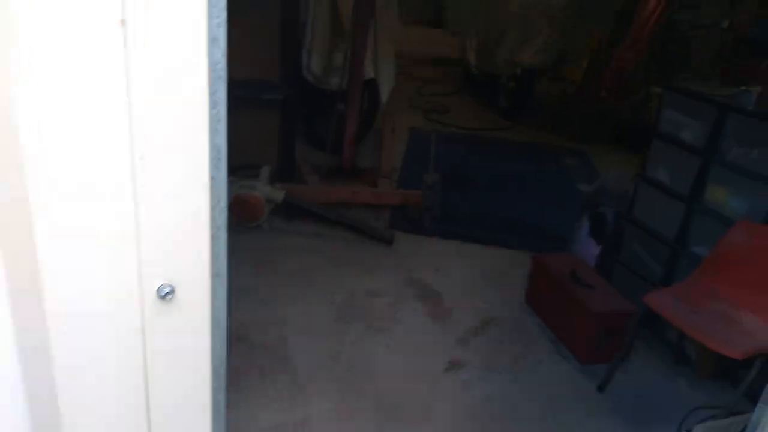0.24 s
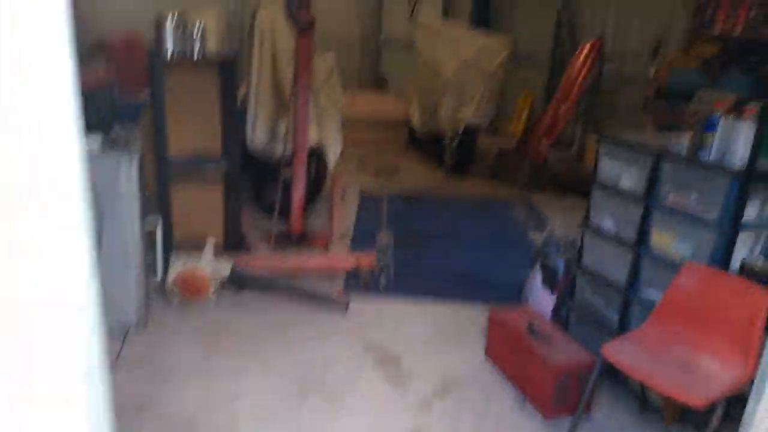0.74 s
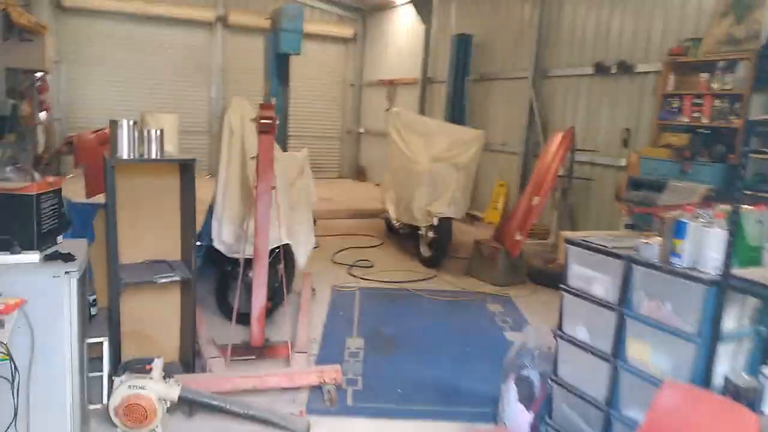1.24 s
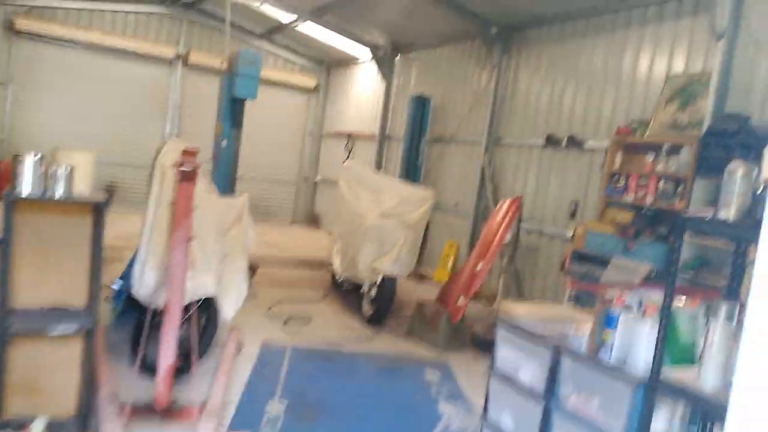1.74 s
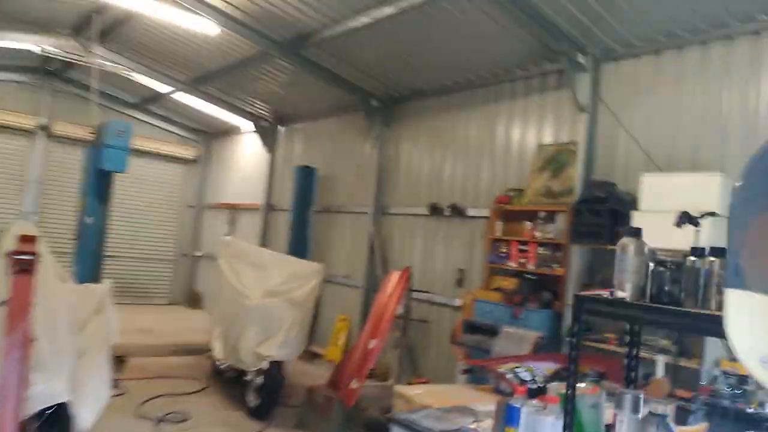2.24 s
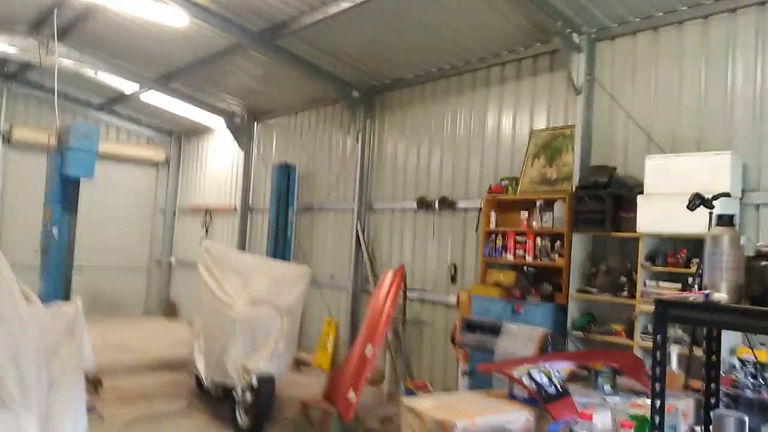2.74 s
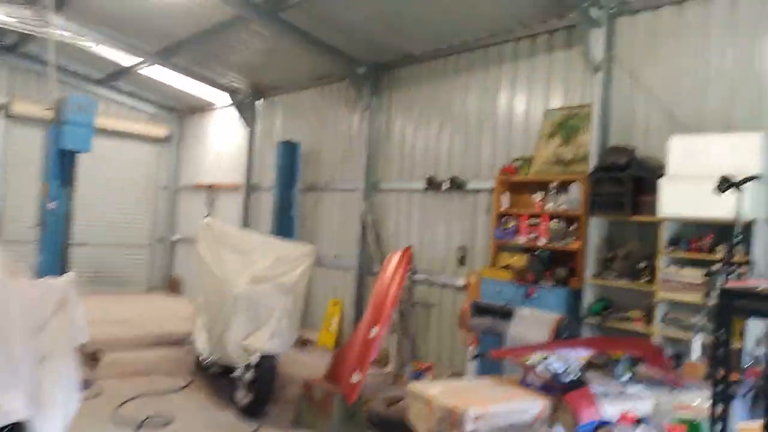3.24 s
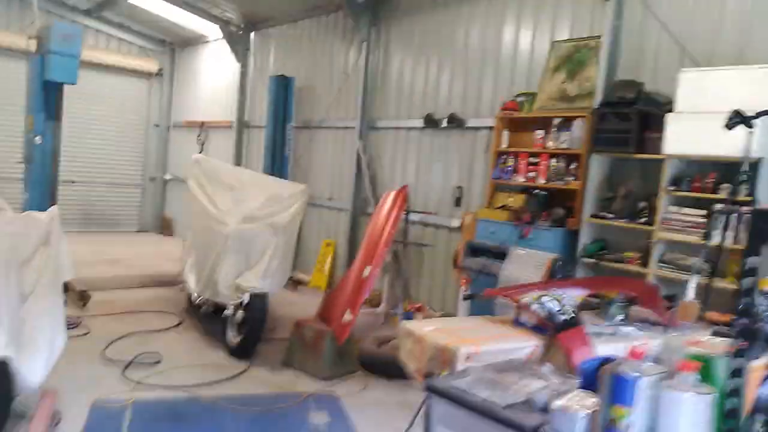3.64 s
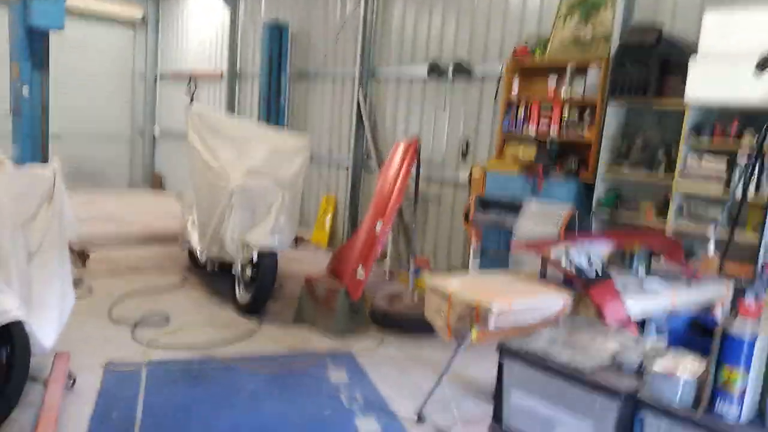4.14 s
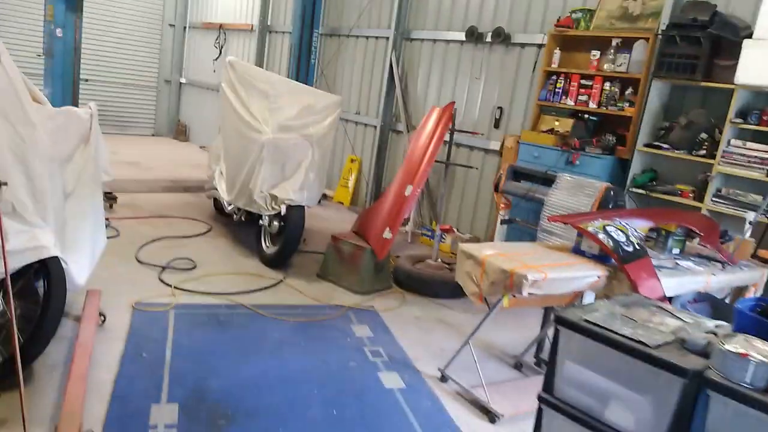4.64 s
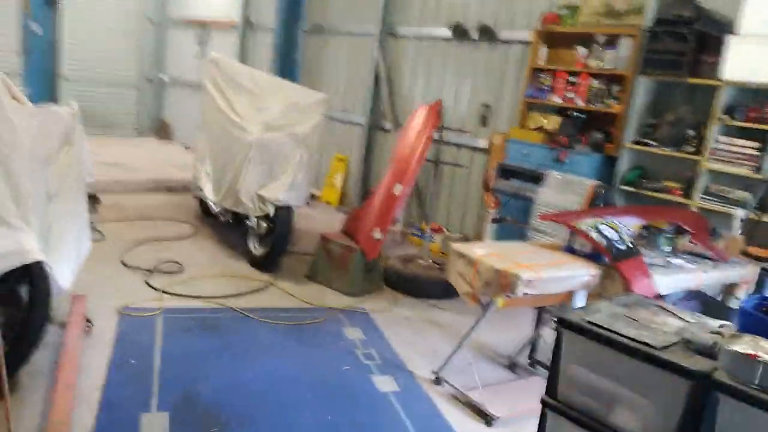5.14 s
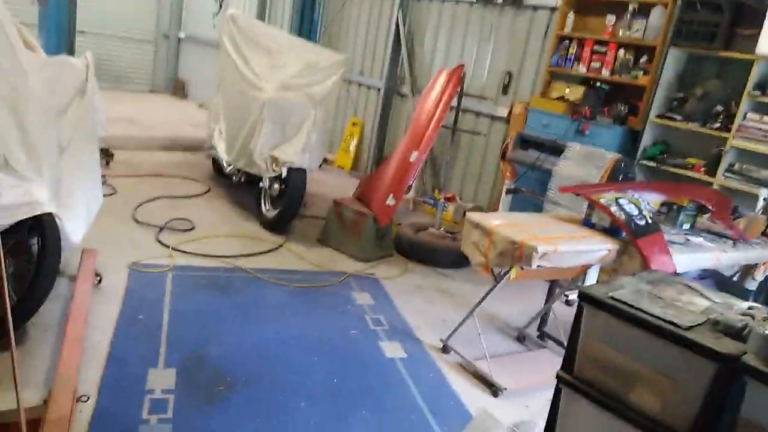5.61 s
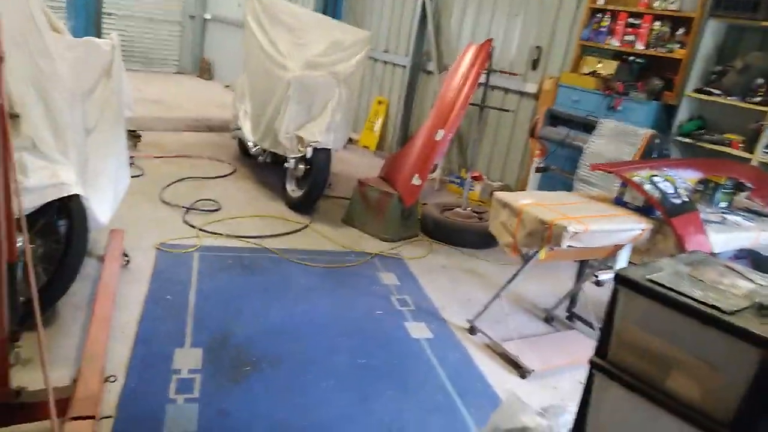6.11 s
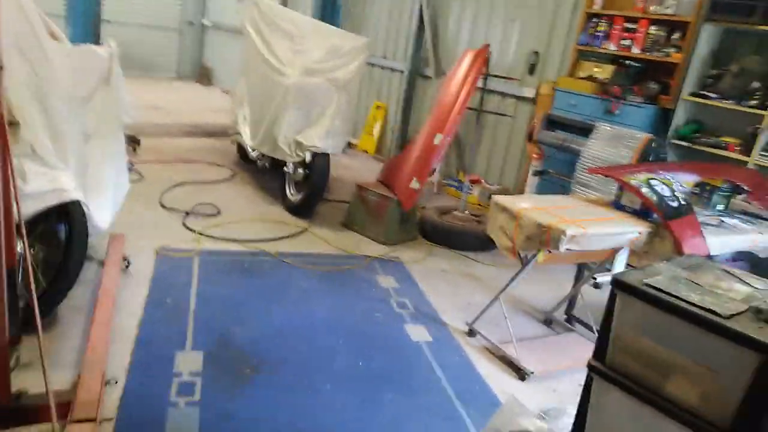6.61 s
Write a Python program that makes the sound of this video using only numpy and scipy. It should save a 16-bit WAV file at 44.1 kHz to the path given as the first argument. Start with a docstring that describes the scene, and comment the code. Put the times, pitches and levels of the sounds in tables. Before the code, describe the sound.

A metal-clad shed door scrapes open with a harsh gritty slide, clothes and shoes brush through, then the door creaks back, clacks and booms shut.

```python
"""In a workshop with still air, a steel-clad shed door scrapes open in a few slips and one long gritty slide.
Someone squeezes through: clothes brush, shoes scuff, loose metal knocks. The door creaks back, clacks and booms
against its frame, its cladding rattles, and one more step follows. A hand-held pair of microphones hears it all.
Rubbing is made of countless tiny random catches; blows are bursts of noise and ringing tones that die away."""
import sys
import numpy as np
from scipy import signal
from scipy.fft import rfft, irfft, next_fast_len
from scipy.io import wavfile

SR = 44100
rng = np.random.default_rng(int(sys.argv[2]) if len(sys.argv) > 2 else 0)


def dump(signal):
    """Clip the signal to [-1, 1] and save it as 16-bit WAV at the path in sys.argv[1]."""
    limited = np.clip(np.atleast_2d(signal).T, -1, 1)
    pcm = np.round(limited * 32767).astype(np.int16)
    wavfile.write(sys.argv[1], SR, pcm)


N = 303025
TIME = np.arange(N) / SR

# spectrum of rubbing cloth: (frequency [Hz], relative level per Hz [dB])
FABRIC = [(250, -2.5), (450, 4), (700, -3), (1200, 2.5), (2000, -6), (3000, 2.5), (4500, -5.5),
          (6500, -1.5), (9000, -2), (11000, -4), (15000, -8.5)]
# ringing tones of the door panel: (frequency [Hz], relative level [dB], time to fall 60 dB [s])
PANEL_MODES = [(128.4, 0, 1.3), (195.3, 1.5, 0.55), (270.5, 0, 0.58), (386, -2, 0.79), (592, -6.5, 0.6),
               (684, -5, 0.32), (755, -10, 0.2), (886, -5.5, 0.39), (1060, -8.5, 0.66)]
# ringing tones of loose metal by the doorway: (frequency [Hz], relative level [dB], time to fall 60 dB [s])
LOOSE_METAL_MODES = [(871, 0.5, 0.16), (1140, -2, 0.28), (1430, -8, 0.29), (2100, -1.5, 0.15)]

PORT_SPACING_S = 0.00054   # travel time of sound from one microphone port to the other
RASP_STOP_S = 1.305   # the sheet lifts clear
SQUEEZE_FROM_S, SQUEEZE_TO_S = 3.11, 3.97   # one long drag through the gap
# (time [s], relative level [dB]) of the door edge and the door panel against the frame, and of the last heel
CLACK_AT, BOOM_AT, HEEL_AT = (5.457, -20.5), (5.784, -25), (6.572, -33)


def from_db(db):
    """Turn decibels into a gain."""
    return 10 ** (np.asarray(db) / 20)


def rms_one(x):
    """Scale a sound to an average (RMS) strength of 1."""
    return x / np.sqrt(np.mean(x ** 2) + 1e-20)


def at_hz(points, hz):
    """Read a table at any frequency, with straight lines on a log-frequency axis."""
    table_hz, values = np.array(points).T
    return np.interp(np.log(np.maximum(hz, 1)), np.log(table_hz), values)


def drift(rate_hz):
    """Slow random wandering with spread 1, worked out at every 20th sample."""
    r = np.exp(-2 * np.pi * rate_hz * 20 / SR)
    noise = rng.standard_normal(N // 20 + 2002)
    slow = signal.lfilter([1], [1, -2 * r, r * r], noise)[2000:]   # drop the filter's start-up
    return np.interp(np.arange(N) / 20, np.arange(len(slow)), rms_one(slow))


def band(x, low_hz, high_hz, order=2):
    """Keep only one range of frequencies."""
    sos = signal.butter(order, [low_hz, high_hz], "band", fs=SR, output="sos")
    return signal.sosfilt(sos, x + 1e-18)


def colour(x, spectrum):
    """Give a steady sound a spectrum."""
    size = next_fast_len(N, True)
    gains = from_db(at_hz(spectrum, np.fft.rfftfreq(size, 1 / SR)))
    return irfft(rfft(x, size) * gains, size)[..., :N]


def resonance(x, hz, width_hz):
    """One resonance: a narrow band-pass with gain 1 at its top."""
    r = np.exp(-np.pi * width_hz / SR)
    feedback = [1, -2 * r * np.cos(2 * np.pi * hz / SR), r * r]
    return signal.lfilter(np.array([1, 0, -1]) * (1 - r * r) / 2, feedback, x)


def resonances(x, modes):
    """Several resonances side by side, each with its own width and level."""
    return sum(from_db(db) * resonance(x, hz, width_hz) for hz, width_hz, db in modes)


def pan(left_db):
    """Left and right gains; left_db is how much louder the left is."""
    return from_db(left_db * np.array([[.5], [-.5]]))


def after(s):
    """Seconds gone by since a moment; zero before it."""
    return np.maximum(TIME - s, 0)


def held(from_s, to_s, rise_db_per_s, fall_db_per_s):
    """Fade in, hold at gain 1, fade out."""
    return from_db(-rise_db_per_s * np.maximum(from_s - TIME, 0) - fall_db_per_s * after(to_s))


def stroke(s, length_s):
    """A rubbing movement swells quickly to gain 1 and dies more slowly."""
    t = TIME - s
    swell = (np.minimum(t, 0) / (0.85 * length_s)) ** 2
    fade = np.maximum(t, 0) / (1.033 * length_s)
    return np.exp(-np.minimum(swell + fade, 40))


def strokes(events):
    """Add up the gains of several rubbing movements."""
    return sum(from_db(db) * stroke(s, length_s) for s, length_s, db in events)


def around(s):
    """The stretch of samples that holds a short stroke."""
    return slice(max(int((s - .3) * SR), 0), int((s + .6) * SR))


def diffuse(size):
    """Noise from all sides at two spaced ports: alike in the bass, unrelated in the treble."""
    padded = next_fast_len(size, True)
    alike = .94 * np.sinc(2 * np.fft.rfftfreq(padded, 1 / SR) * PORT_SPACING_S)
    mid, side = rfft(rng.standard_normal((2, padded)))
    both = np.sqrt(1 + alike) * mid + np.sqrt(1 - alike) * side * [[1], [-1]]
    return irfft(both, padded)[:, :size] / np.sqrt(2)


def scatter(x, t60):
    """A dense cloud of reflections at unit gain that falls 60 dB in t60 seconds."""
    t = TIME[:int(t60 * SR)]
    echoes = diffuse(len(t)) * from_db(-60 * t / t60)
    echoes /= np.sqrt(np.sum(echoes ** 2) / 2)
    return signal.oaconvolve(np.atleast_2d(x), echoes, axes=1)[:, :N]


def friction(per_s, spread_db, chatter_db, chatter_hz, direct_db):
    """Tiny catches of uneven size come in clumps; they reach the right port first, then scatter."""
    sizes = from_db(spread_db * np.minimum(rng.exponential(1, N), 4)) * rng.choice([-1, 1], N)
    happens = rng.random(N) < per_s / SR
    catches = rms_one(sizes * happens * from_db(chatter_db * drift(chatter_hz)))
    # the left port hears contacts later, less so once the person is inside
    near_s, far_s, turns_s = 0.00045, 0.0002, 2.3
    lag_s = far_s + (near_s - far_s) * np.exp(-(TIME / turns_s) ** 2)
    late = catches[np.arange(N) - np.round(lag_s * SR).astype(int)]
    direct = np.array([late, catches])
    # the contact moves, so each catch scatters into a short cloud of its own
    keep = np.exp(-1 / (0.0076 * SR))
    cloud = np.sqrt(signal.lfilter([1 - keep], [1, -keep], catches ** 2 + 1e-18)) * diffuse(N)
    return from_db(direct_db) * direct + cloud


def shifting_modes(x):
    """As a contact travels, it favours now one, now another of the steel's many narrow modes."""
    sharpness, swing_db, shifts_hz = 48, 3.7, 12
    out = x
    for hz in np.geomspace(450, 6000, 44):
        favour_db = np.clip(swing_db * drift(shifts_hz), -12, 7) - 1
        out = out + (from_db(favour_db) - 1) * resonance(x, hz, hz / sharpness)
    return out


def hollow(x):
    """Rubbing sets the panel's hollow resonances going."""
    # hollow resonances of the rubbed panel: (frequency [Hz], width [Hz], level [dB])
    hollow_modes = [(306.5, 20, 3), (387, 8, -5), (652, 150, 1.5)]
    return x + resonances(x, hollow_modes)


def strikes(events):
    """One click for each contact."""
    clicks = np.zeros(N) + 1e-18
    for s, db in events:
        clicks[int(s * SR)] = from_db(db)
    return clicks


def bursts(events, low_hz, high_hz, t60):
    """Each contact sets off a short, dense ring within one band."""
    envelope = signal.lfilter([1], [1, -from_db(-60 / (t60 * SR))], strikes(events))
    return envelope * rms_one(band(diffuse(N), low_hz, high_hz))


def thuds(events, hz, t60):
    """A soft push: a few cycles of one low mode."""
    r, w = from_db(-60 / (t60 * SR)), 2 * np.pi * hz / SR
    return signal.lfilter([0, np.sin(w)], [1, -2 * r * np.cos(w), r * r], strikes(events))


def ring(start, modes, strength_db, uneven_db=0):
    """Clearest modes of a struck part: close pairs that beat, each reaching the ports at its own delays."""
    out, part = np.zeros((2, N)), slice(int(start * SR), int((start + 2) * SR))
    for hz, db, t60 in modes:
        t = np.maximum(TIME[part] - start - rng.uniform(0, PORT_SPACING_S, (2, 1)), 0)
        twin_hz = hz + 17 * rng.uniform(0.53, 1)   # the weaker twin lies 9 to 17 Hz above
        twin = .5 * rng.choice([-1, 1]) * np.sin(2 * np.pi * twin_hz * t)
        level_db = strength_db + db + uneven_db * rng.standard_normal() - 60 * t / t60
        out[:, part] += from_db(level_db) * (np.sin(2 * np.pi * hz * t) + twin)
    return out


def blow(event, spectrum, ring_times, rise_s):
    """A blow spreads through countless modes that die band by band."""
    s, db = event
    start = int(s * SR)
    t, edges = TIME[:N - start], np.geomspace(30, 17000, 19)
    white, out, power = [diffuse(len(t)), diffuse(len(t))], np.zeros((2, N)), 0
    for k, (low, high) in enumerate(zip(edges, edges[1:])):
        hz = np.sqrt(low * high)
        gain = from_db(at_hz(spectrum, hz))
        envelope = from_db(-60 * t / at_hz(ring_times, hz)) * (1 - np.exp(-t / rise_s))
        beating = from_db(1.8 * drift(20)[start:] * np.minimum(t / 0.1, 1))   # close modes beat as they die
        # neighbouring bands take turns with two unrelated noises
        out[:, start:] += gain * band(white[k % 2] * envelope * beating, low, high)
        power += gain ** 2 * (high - low) / (SR / 2)
    return from_db(db) * out / np.sqrt(power)


def push(follows):
    """Gain of a sound that follows the push on the door by some share; the push builds, holds and eases."""
    # the edge bites harder for a moment: (time of the height [s], length [s], extra level at share 1 [dB])
    surges = [(0.518, 0.065, 4), (0.825, 0.032, 3)]
    surge_db = sum(db * stroke(s, length_s) for s, length_s, db in surges)
    steady = held(0.305, 1.09, rise_db_per_s=62, fall_db_per_s=21)
    return (steady * from_db(surge_db)) ** follows


def door_side():
    """The grinding edge moves from the left to just right of centre."""
    start_left_db, end_left_db, passes_s = 3, -0.5, 0.35
    return pan(end_left_db + (start_left_db - end_left_db) * np.exp(-(TIME / passes_s) ** 2))


def squeezing():
    """Gain of the long drag through the gap."""
    return held(SQUEEZE_FROM_S, SQUEEZE_TO_S, rise_db_per_s=158, fall_db_per_s=128)


def pressing():
    """The weight on the panel grows by 14 dB a second, to gain 1 at the end of the drag."""
    return squeezing() * from_db(14 * (TIME - SQUEEZE_TO_S))


def still_air():
    """A faint steady hiss from all sides."""
    # spectrum of the air: (frequency [Hz], relative level per Hz [dB])
    air_spectrum = [(140, -0.5), (400, -12.5), (1000, -12.5), (4000, -18.5), (9000, -16), (15000, -12.5)]
    return from_db(-56.0) * rms_one(colour(diffuse(N), air_spectrum))


def handling():
    """The microphones rumble with the push on the door, the squeeze and each sway of the hand."""
    # spectrum of the rumble: (frequency [Hz], relative level per Hz [dB])
    rumble_spectrum = [(25, -3), (47, 2.5), (110, 3), (180, -3.5), (270, -22), (600, -49)]
    # the holding hand sways: (time of the height [s], length [s], relative level [dB])
    sways = [(0.424, 0.075, -34.5), (1.168, 0.12, -45.5), (4.132, 0.055, -40.5), (4.777, 0.14, -51),
             (6.49, 0.072, -41)]
    shake = diffuse(N) + from_db(-5.0) * rng.standard_normal((2, N))   # each port also shakes on its own
    door = from_db(-43.5) * push(follows=0.55) * held(0.55, RASP_STOP_S, rise_db_per_s=94, fall_db_per_s=25)
    movement = door + from_db(-48.0) * pressing() + strokes(sways)
    return from_db(-2.5) * movement * rms_one(colour(shake, rumble_spectrum))


def squeaks():
    """A rubbing contact sings briefly in one narrow resonance."""
    # squeaks: (time of the height [s], length [s], relative level [dB], frequency [Hz])
    squeak_events = [(1.23, 0.056, -31.5, 2030), (1.385, 0.016, -49, 680), (6.37, 0.084, -59, 1450)]
    rub, width_hz = diffuse(N), 140   # width of each of two resonances in a row
    out = np.zeros((2, N))
    for s, length_s, db, hz in squeak_events:
        tone = resonance(resonance(rub, hz, width_hz), hz, width_hz)
        out += from_db(db) * stroke(s, length_s) * rms_one(tone)
    return out


def knocks():
    """Each light knock is a short clunk followed by the ring of the loose metal."""
    # light knocks on loose metal by the doorway: (time [s], relative level [dB])
    knock_events = [(1.648, -46), (1.7018, -38), (1.742, -35), (4.812, -46)]
    clunks = from_db(-2.0) * bursts(knock_events, 650, 2500, t60=0.069)
    rings = sum(ring(s, LOOSE_METAL_MODES, strength_db=db, uneven_db=2.5) for s, db in knock_events)
    return clunks + from_db(-12.0) * rings


def grit_ticks():
    """Grit cracks under a sole: very short bursts of noise."""
    # cracking grit: (time [s], relative level [dB])
    tick_events = [(3.0936, -27), (3.421, -28), (3.836, -28), (4.168, -26.5), (5.0694, -43), (5.434, -45),
                   (6.561, -35)]
    return from_db(-3.5) * bursts(tick_events, 1400, 4200, t60=.06)


def footfalls():
    """Soft footfalls and bumps: a few cycles of a low mode with a short burst of bass noise."""
    # soft footfalls and bumps: (time [s], relative level [dB])
    thud_events = [(0.596, -28), (1.198, -33), (1.405, -38.5), (2.982, -32), (3.955, -33), (5.959, -25),
                   (6.168, -34), (6.586, -33.5)]
    noise = band(bursts(thud_events, 42, 117, t60=0.14), 24, 143, order=4)
    return from_db(1.0) * thuds(thud_events, hz=63.0, t60=0.04) + from_db(-0.5) * noise


def last_heel():
    """The last heel lands as a blow and also sets the loose metal ringing."""
    # spectrum of the heel: (frequency [Hz], relative level per Hz [dB])
    heel_spectrum = [(60, -1), (150, 7), (350, -0.5), (600, -15), (950, 8), (1400, -1), (2000, -5),
                     (3200, -14), (5000, -8.5), (9000, -14), (14000, -54)]
    # how long it rings: (frequency [Hz], time to fall 60 dB [s])
    heel_ring_times = [(60, 0.42), (1000, 0.29), (12000, 0.46)]
    heel = blow(HEEL_AT, heel_spectrum, heel_ring_times, rise_s=0.0011)
    return heel + ring(HEEL_AT[0], LOOSE_METAL_MODES, strength_db=-37.5)


def scuffs_and_bumps():
    """Short gritty strokes swell and die: mostly soles, also bumps on the panel and a cloth swish."""
    # strokes, each in its own band: (time of the height [s], length [s], relative level [dB], centre [Hz],
    # reach of the band below and above the centre [factor], left over right [dB])
    gritty_strokes = [(1.573, 0.14, -55, 1700, 2.7, 4), (1.749, 0.064, -42, 1550, 2.04, 5.5),
                      (2.43, 0.058, -56, 2900, 1.3, 9), (2.525, 0.078, -53.5, 1950, 2, -2),
                      (2.764, 0.13, -55, 1660, 2.2, -1), (2.842, 0.037, -43.5, 1900, 2.9, -1),
                      (2.922, 0.05, -46, 1900, 1.9, 2), (3.115, 0.033, -29, 1950, 2, 7),
                      (3.307, 0.14, -38, 1900, 3.2, 6), (3.725, 0.047, -36.5, 890, 1.6, -3.5),
                      (3.823, 0.056, -39.5, 2070, 2.3, 10), (3.956, 0.056, -35.5, 990, 5, 5),
                      (4.106, 0.044, -28, 2570, 2, 3.5), (4.458, 0.037, -53.5, 1680, 1.54, 7.5),
                      (6.443, 0.06, -47, 1400, 1.48, 2.5), (6.762, 0.047, -38, 5400, 1.61, 3)]
    grit = friction(per_s=2500, spread_db=3.0, chatter_db=3.0, chatter_hz=50.5, direct_db=-4.5)
    out = np.zeros((2, N))
    for s, length_s, db, hz, reach, left_db in gritty_strokes:
        part = around(s)
        scrape = rms_one(band(grit[:, part], hz / reach, hz * reach, order=3))
        out[:, part] += from_db(db) * stroke(s, length_s)[part] * pan(left_db) * scrape
    return out + from_db(-8.0) * resonance(out, hz=1710, width_hz=270)   # adds bite to every stroke


def clothes():
    """Fibres flick over each other: a fine, even hiss; each stroke is given its own upper edge."""
    # a sleeve or trouser leg brushes: (time of the height [s], length [s], relative level [dB],
    # left over right [dB], upper edge of the hiss [Hz])
    brushes = [(1.476, 0.092, -42.5, -2, 10500), (1.697, 0.049, -44, -2, 13100),
               (1.826, 0.042, -44.5, -2, 13100), (2.221, 0.048, -41.5, -5.5, 17000),
               (2.58, 0.1, -45.5, 1.5, 10500), (2.78, 0.04, -47, 5, 10100), (2.843, 0.036, -28.5, 2, 18000),
               (2.905, 0.046, -34, -0.5, 18000), (4.102, 0.057, -22.5, 0, 13600),
               (4.443, 0.1, -55, 0, 10900), (4.757, 0.02, -51, -1, 9600), (4.859, 0.024, -44, -3, 11000),
               (6.45, 0.05, -50, 3, 10200), (6.772, 0.019, -40, 12, 17000)]
    rub = friction(per_s=14000, spread_db=-3.0, chatter_db=1.36, chatter_hz=69.4, direct_db=-14.5)
    rub = colour(rub, FABRIC)
    drag = rms_one(band(rub, 5130, 19845, order=4))
    out = from_db(-26.0) * squeezing() * pan(left_db=-3.0) * drag
    for s, length_s, db, left_db, top_hz in brushes:
        part = around(s)
        hiss = rms_one(band(rub[:, part], 5620, top_hz, order=4))
        out[:, part] += from_db(db) * stroke(s, length_s)[part] * pan(left_db) * hiss
    return from_db(-4.5) * out


def squeeze():
    """A coat drags along the cladding; a hollow rub lies under it."""
    # a shoulder or hip rubs on a hollow panel: (time of the height [s], length [s], relative level [dB])
    panel_rubs = [(1.822, 0.1, -56), (3.728, 0.034, -47), (3.817, 0.036, -47.5), (3.97, 0.042, -47),
                  (4.1, 0.078, -48.5), (4.626, 0.042, -60), (5.063, 0.37, -58.5)]
    drag = friction(per_s=6000, spread_db=4.5, chatter_db=1.5, chatter_hz=40.4, direct_db=-19.5)
    drag = colour(drag, FABRIC)
    judder = from_db(1.7 * drift(45))   # the cloth catches and lets go
    coat = rms_one(band(drag, 1100, 7600, order=3))
    top = from_db(-41.5) * squeezing() * judder * coat * pan(left_db=1.0)
    rubs = from_db(-48.5) * pressing() + strokes(panel_rubs)
    return top + from_db(1.5) * rubs * rms_one(band(hollow(drag), 182, 890, order=3))


def cladding():
    """Loose sheets chatter on their screws while the panel swings after the boom."""
    chatter = friction(per_s=2200, spread_db=4.0, chatter_db=1.0, chatter_hz=60, direct_db=-11)
    swing = from_db(-38) * held(5.81, 6.015, rise_db_per_s=503, fall_db_per_s=155)
    top = from_db(-3.5) * rms_one(band(chatter, 4300, 9100))
    middle = rms_one(band(chatter, 860, 1960))
    low = rms_one(band(hollow(chatter), 194, 550))
    return swing * (top + middle + low)


def rebounds():
    """The swinging panel knocks against its stop or frame: a dull clunk that rings its modes unevenly."""
    # knocks at the end of its travel, and on the frame after the boom: (time [s], relative level [dB])
    rebound_events = [(1.385, -42.5), (5.983, -32), (6.108, -36.5)]
    clunks = bursts(rebound_events, 90, 570, t60=0.1)
    rings = sum(ring(s, PANEL_MODES, strength_db=db, uneven_db=4.5) for s, db in rebound_events)
    return clunks + from_db(-14.5) * rings


def hinge():
    """The door swings back: uneven slips in the hinge ring its resonances."""
    # creaks: (time of the height [s], length [s], relative level [dB])
    creak_events = [(4.839, 0.039, -45.5), (5.002, 0.094, -53)]
    # resonances of the hinge: (frequency [Hz], width [Hz], relative level [dB])
    hinge_modes = [(1510, 120, -3.5), (2450, 110, -3), (2750, 150, 0), (3280, 130, -6)]
    slips = friction(per_s=760, spread_db=3.0, chatter_db=2.5, chatter_hz=40, direct_db=-6)
    creak = from_db(-14) * slips + resonances(slips, hinge_modes)
    return rms_one(band(creak, 450, 3050, order=3)) * strokes(creak_events) * pan(left_db=3.5)


def door_shut():
    """The latch edge clacks, the whole panel booms; both blows ring the panel's modes."""
    # spectra of the two blows: (frequency [Hz], relative level per Hz [dB])
    clack_spectrum = [(60, 1), (300, -3.5), (600, 0), (1200, -4), (1900, 1), (2800, -8.5), (4000, -2),
                      (6000, -13), (9000, -4), (12000, -18.5)]
    boom_spectrum = [(60, -2), (130, 1), (250, -2.5), (400, -2.5), (800, -16), (1200, -14.5), (2600, -19.5),
                     (6000, -28.5), (9000, -15), (12000, -35.5)]
    # how long each blow rings: (frequency [Hz], time to fall 60 dB [s])
    clack_ring_times = [(60, 2.7), (400, 0.96), (3000, 0.55), (8000, 0.43)]
    boom_ring_times = [(100, 1.28), (1100, 1.1), (3000, 0.78), (12000, 0.71)]
    # ringing tones of the steel door edge: (frequency [Hz], relative level [dB], time to fall 60 dB [s])
    edge_modes = [(1236, -10, 0.45), (1660, -9, 0.92), (2020, 2, 0.54), (2440, 1, 0.41), (3900, 0, 0.25)]
    clack_s, boom_s = CLACK_AT[0], BOOM_AT[0]
    # the first touch of steel on steel
    crack = from_db(-20.0) * bursts([(clack_s, 0)], 1000, 8500, t60=0.022)
    clack = blow(CLACK_AT, clack_spectrum, clack_ring_times, rise_s=0.0004) * from_db([[.5], [-2.0]])
    clack_ring = ring(clack_s, edge_modes, strength_db=-34.5) + ring(clack_s, PANEL_MODES, strength_db=-43.0)
    # the whole edge meets the frame
    slam = from_db(-21.5) * bursts([(boom_s, 0)], 200, 1150, t60=0.14)
    boom = blow(BOOM_AT, boom_spectrum, boom_ring_times, rise_s=0.001) * from_db([[0.0], [-1.0]])
    boom_ring = ring(boom_s, PANEL_MODES, strength_db=-32.5)
    return crack + clack + clack_ring + slam + boom + boom_ring


def sharp_slips():
    """Sharp slips and snags: each sets off a short, bright burst of noise."""
    # slips and snags: (time [s], relative level [dB])
    slip_events = [(0.056, -18.5), (0.1016, -14.5), (0.155, -11), (0.2094, -10), (0.2988, -6.5),
                   (0.792, -7), (2.806, -33), (3.27, -17), (4.048, -21.5), (5.356, -43), (6.638, -35),
                   (6.8214, -29.5)]
    return from_db(-10.0) * bursts(slip_events, 5600, 14500, t60=0.15) * door_side()


def door_slide():
    """The edge grinds along: fine grit on top, the sheet rasping and droning below."""
    # spectrum of the grinding sheet: (frequency [Hz], relative level per Hz [dB])
    sheet_spectrum = [(250, -8.5), (380, -2.5), (800, -7), (1150, -6), (1500, -2), (2000, -2.5),
                      (2500, -4.5), (4000, 0), (5200, -3), (7000, 1), (9000, 0.5), (12000, -2.5),
                      (15000, -6.5)]
    # resonances of the sliding sheet: (frequency [Hz], width [Hz], relative level [dB])
    sheet_modes = [(630, 260, -18), (1560, 210, -12), (1970, 180, -26)]
    grit = push(follows=1) * from_db(-330 * after(1.395))   # the door comes to rest and the grit dies
    rasp = push(follows=0.76) * from_db(-140 * after(RASP_STOP_S))
    # the panel drones once the door runs, and more the further it stands out
    drone = held(0.29, RASP_STOP_S, rise_db_per_s=134, fall_db_per_s=69) * from_db(4 * TIME)
    grind = friction(per_s=4000, spread_db=3.3, chatter_db=1.0, chatter_hz=60, direct_db=-6.5)
    grind = colour(grind, sheet_spectrum)
    steely = grind + from_db(-7) * scatter(grind, t60=0.15)   # the sheet's dense, fixed modes ring briefly
    sheet = steely + from_db(-3.5) * resonances(steely, sheet_modes)
    top = from_db(-21.5) * grit * rms_one(band(grind, 6000, 19845)) * door_side()
    judder = from_db(2.1 * drift(110))   # the edge sticks and slips
    scrape = rms_one(band(sheet, 830, 4490, order=3))
    middle = from_db(-26.5) * rasp * judder * scrape * pan(left_db=3.6)
    low = from_db(-44.5) * drone * rms_one(band(hollow(steely), 117, 740, order=3))
    return top + middle + low


def scene():
    """Door, clothes and shoes sound in the workshop, over handling rumble and still air."""
    rubbing = shifting_modes(scuffs_and_bumps() + squeeze() + cladding() + hinge() + door_slide())
    contacts = squeaks() + knocks() + grit_ticks() + footfalls() + last_heel() + sharp_slips()
    near = rubbing + contacts + clothes()
    workshop = from_db(-12.5) * scatter(near, t60=.36)   # reflections from sheet walls and clutter
    return still_air() + handling() + workshop + near + rebounds() + door_shut()


def record(dry):
    """The cavity before each microphone lifts some treble; peaks are rounded, bottom and top are cut."""
    port_hz = (8460, 9180)   # cavity resonance at the left and right port
    lifted = [x + from_db(8.5) * resonance(x, hz, width_hz=1050) for x, hz in zip(dry, port_hz)]
    heard = signal.sosfilt(signal.butter(3, 33, "high", fs=SR, output="sos"), np.array(lifted))
    heard = heard / (1 + (heard / .92) ** 6) ** (1 / 6)
    return signal.sosfilt(signal.ellip(12, .1, 90, 16000, fs=SR, output="sos"), heard)


dry = scene()
out = record(dry)
dump(out)
```